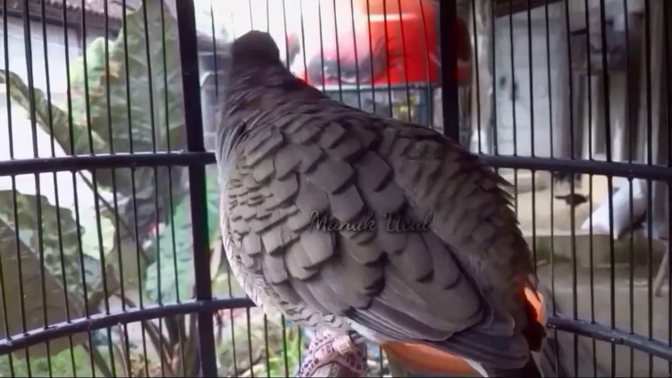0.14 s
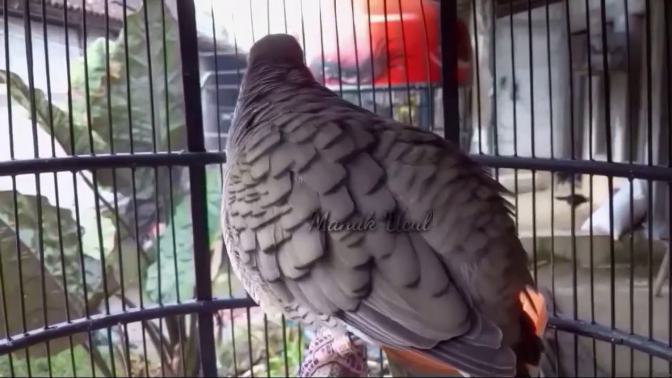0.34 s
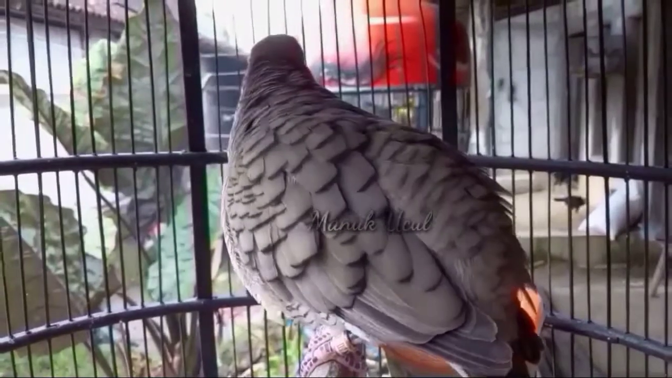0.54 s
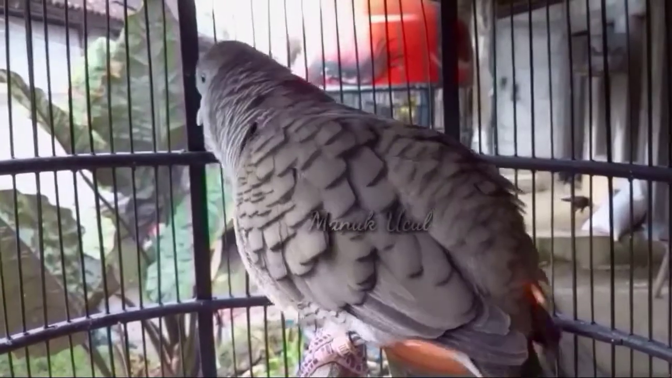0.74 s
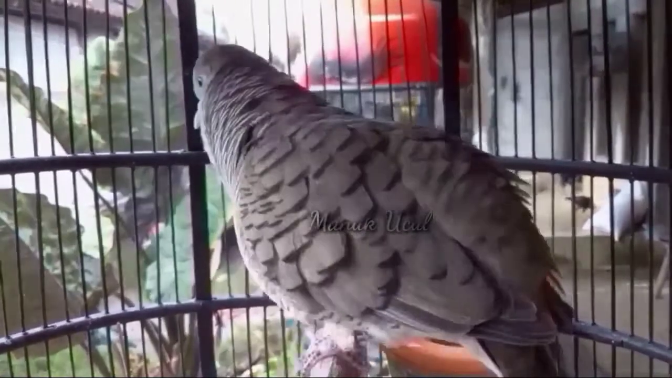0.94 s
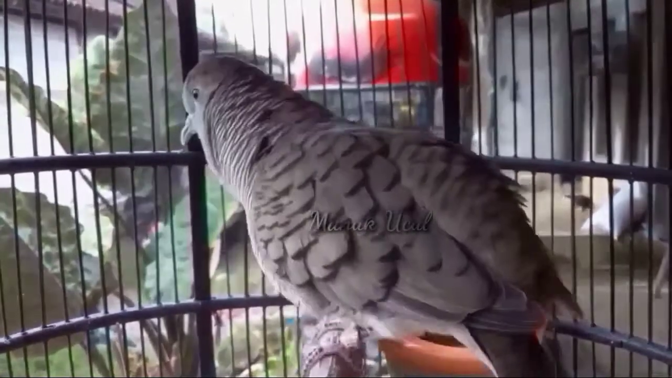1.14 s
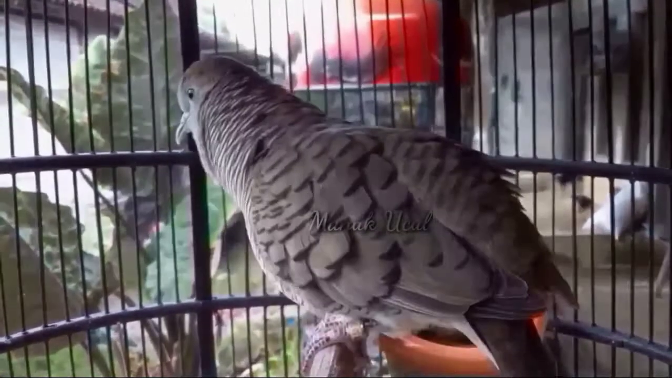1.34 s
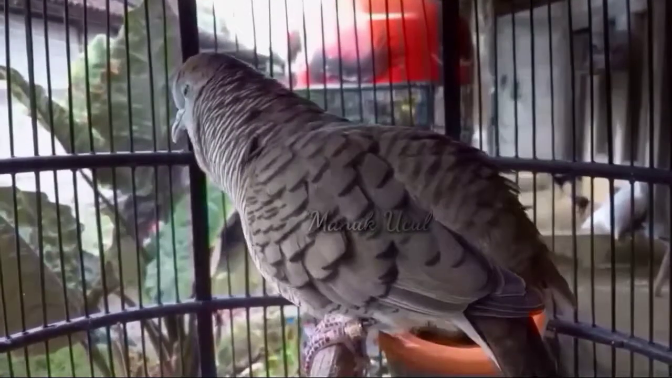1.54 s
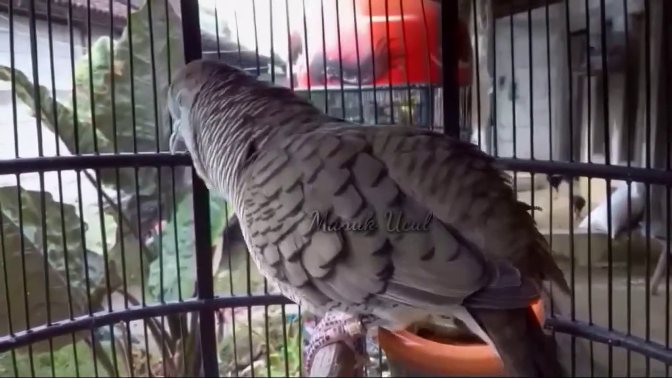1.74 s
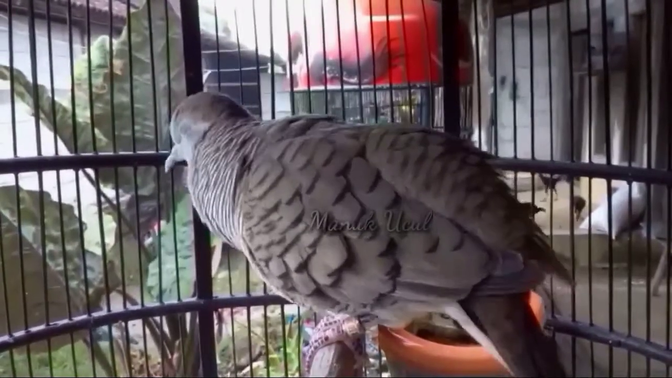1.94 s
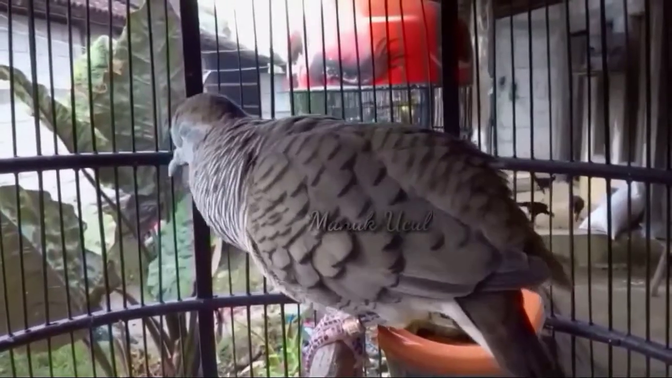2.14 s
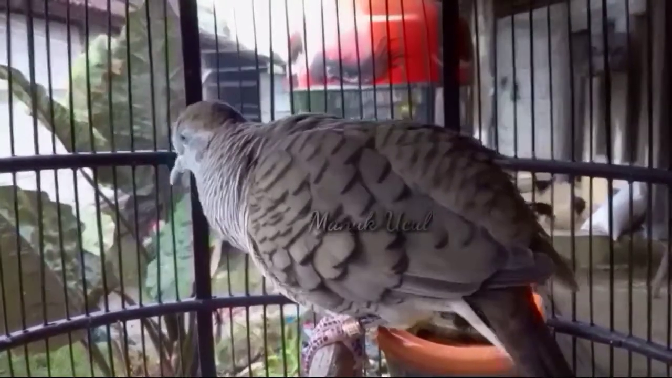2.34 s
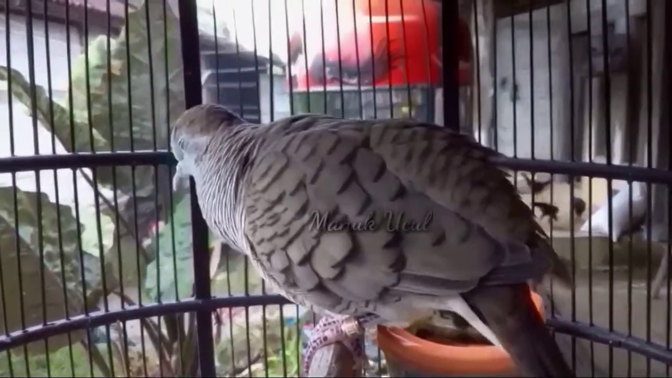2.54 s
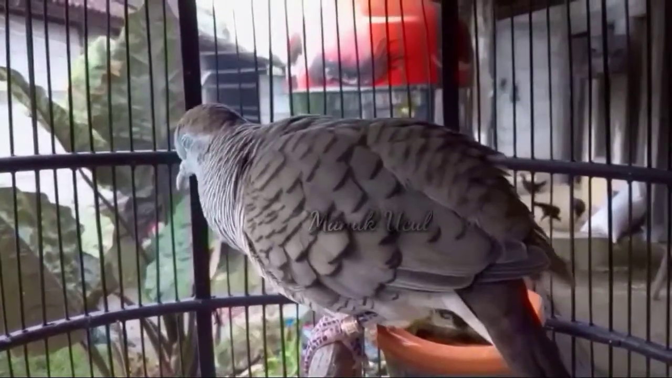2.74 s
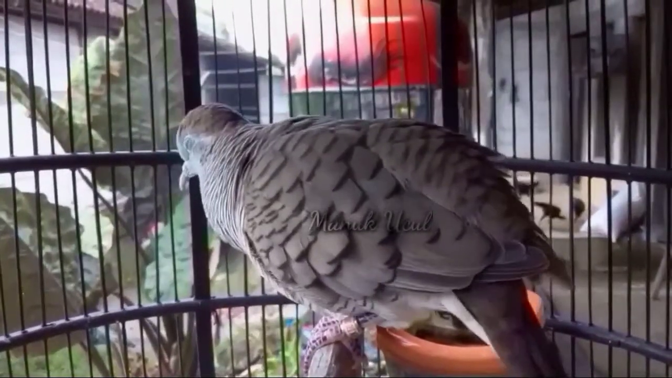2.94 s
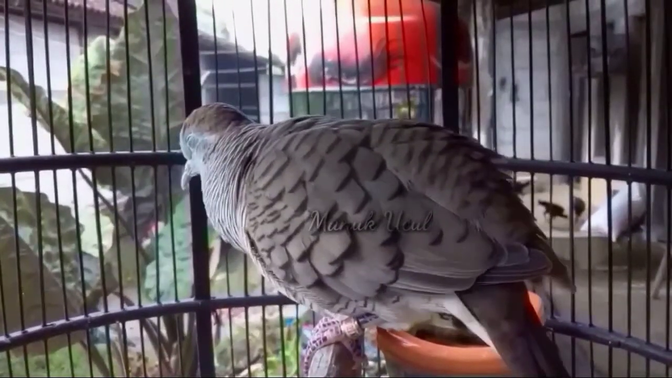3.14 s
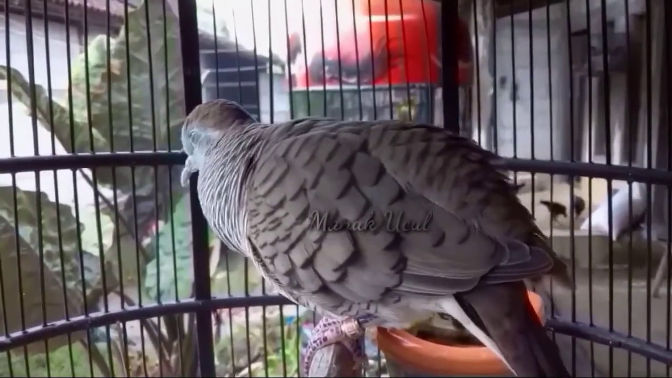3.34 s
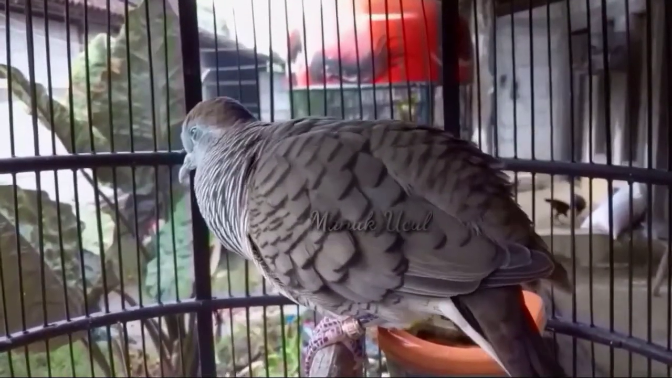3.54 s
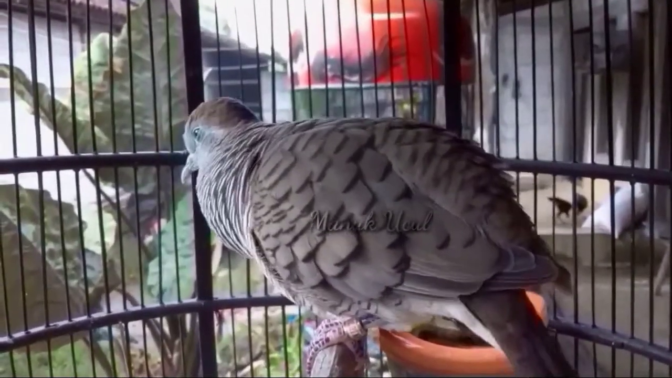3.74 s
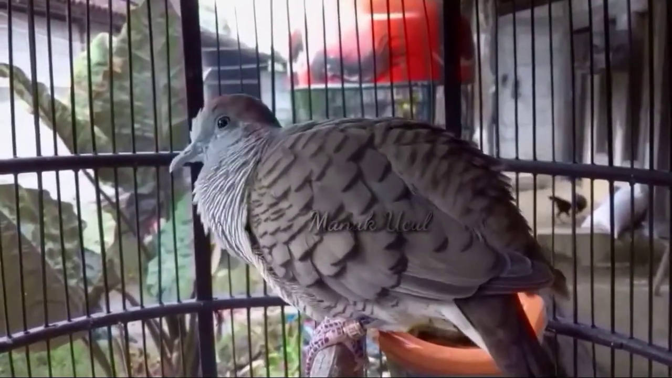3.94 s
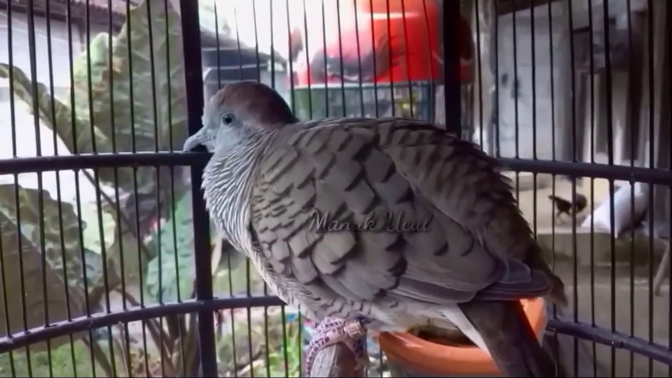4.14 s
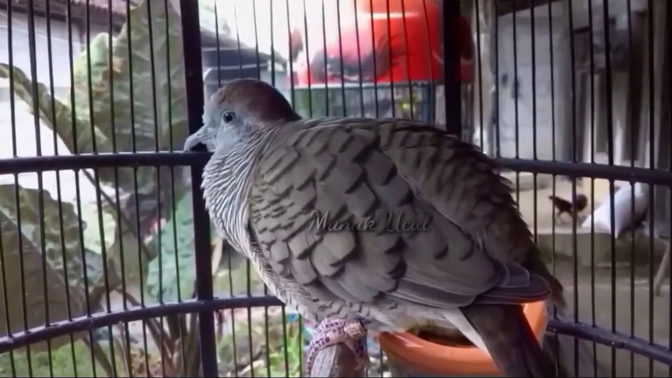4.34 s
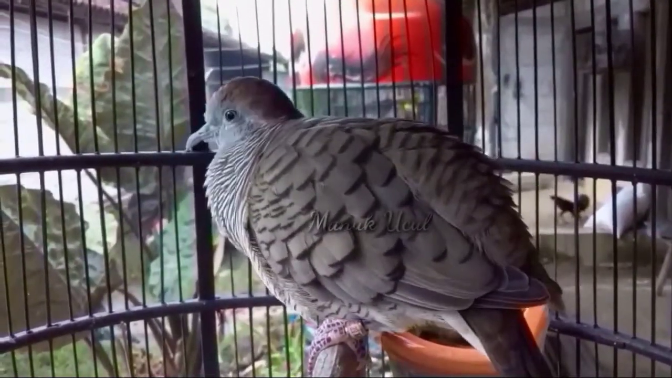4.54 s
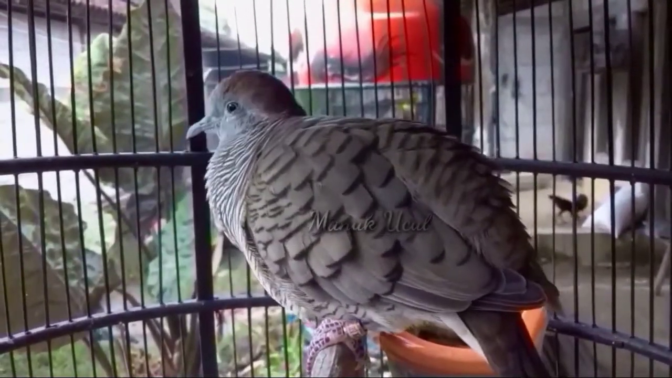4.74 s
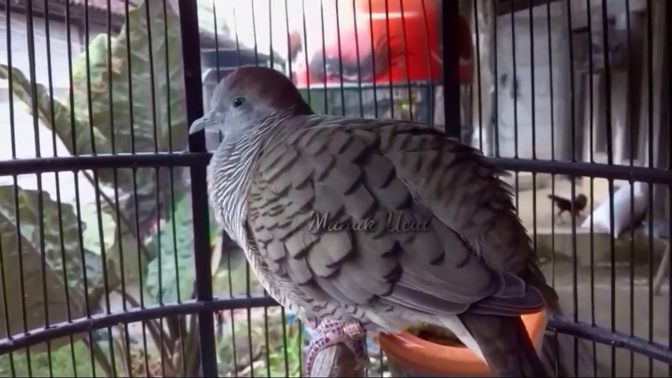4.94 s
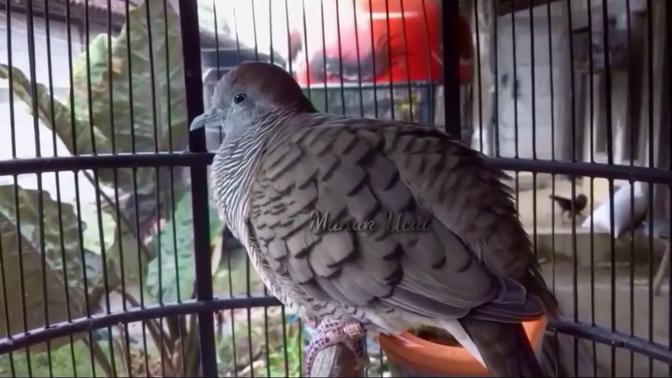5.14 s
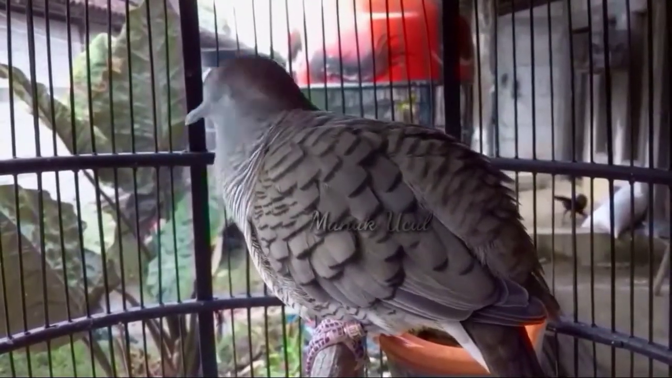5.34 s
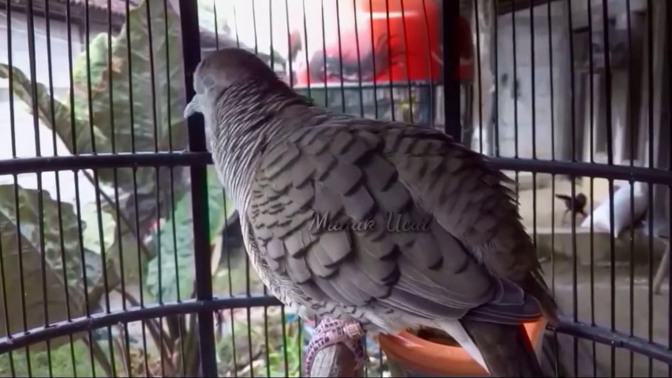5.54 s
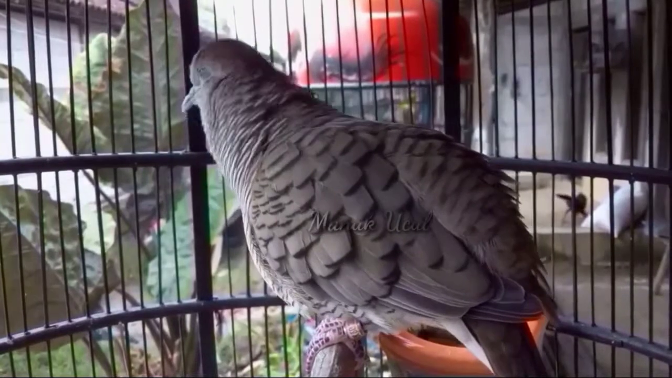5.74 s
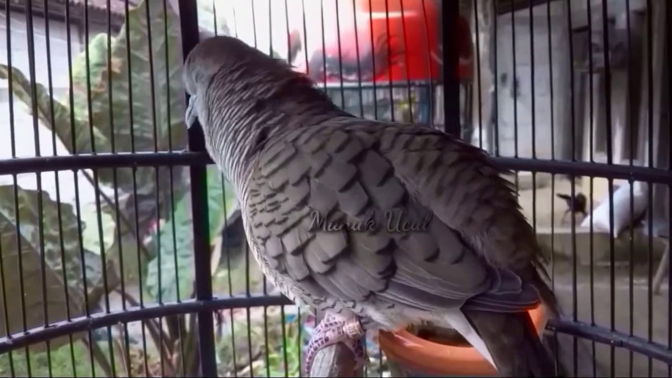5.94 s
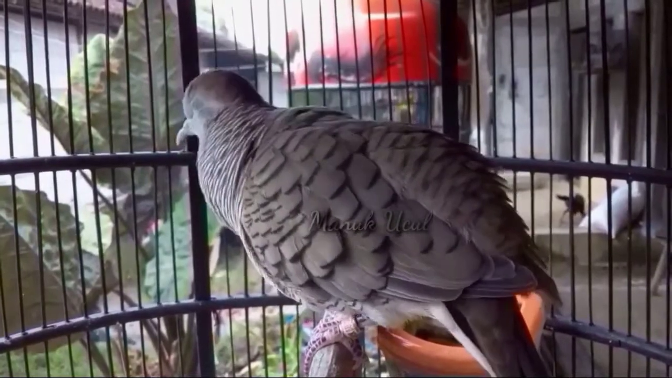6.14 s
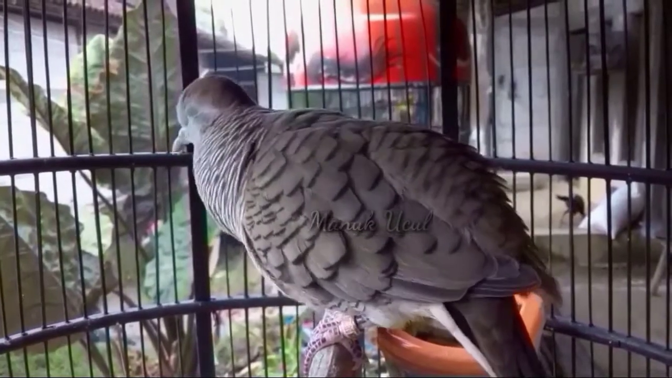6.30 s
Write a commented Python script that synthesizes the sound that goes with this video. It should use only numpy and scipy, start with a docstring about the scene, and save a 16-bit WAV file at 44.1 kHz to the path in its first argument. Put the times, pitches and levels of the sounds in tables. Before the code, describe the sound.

A yard with a faint low town rumble and thin insect hiss throughout. For the first two seconds, small birds give quiet falling chirps, with distant coos and a couple of tiny squawks; feathers rustle softly from about 1 second. At 2.1 seconds a caged dove, close to the microphone, sings a loud note that leaps upward and slightly overloads. Four short coos follow between 2.6 and 3.3 seconds, then a longer falling coo from 3.5 to 3.9. Each note is nearly pure, with a brief rasp at its start. The background dips around the song, while faint, evenly repeated hoots run from 2 to 4.5 seconds. A distant dove answers softly from 4.5 seconds with a leap, five short coos and a long one. At about 6.3 seconds the close dove begins another loud leaping note.

```python
"""A yard with a caged zebra dove close to the microphone: a leaping note, four short coos, a long
falling one, then the next leap. Each note opens with a rasp of the syrinx and settles into a near-pure
tone, filtered by the swollen throat; the loudest overloads the microphone. A far dove answers, other
birds chirp, coo, squawk and hoot, and feathers rustle. Insects hiss over a low town rumble; the
recorder turns both down around the loud song."""
import sys
import numpy as np
from scipy import signal
from scipy.fft import rfft, irfft
from scipy.io import wavfile
from scipy.ndimage import uniform_filter1d

SR = 44100
rng = np.random.default_rng(int(sys.argv[2]) if len(sys.argv) > 2 else 0)


def put_to_file(sound):
    """Save the sound as 16-bit audio at rate SR, in the file named by the first command-line argument."""
    columns = np.atleast_2d(sound).T  # one column per channel
    safe = np.clip(columns, -1, 1)
    whole_steps = np.round(safe * 32767)
    wavfile.write(sys.argv[1], SR, whole_steps.astype(np.int16))


N = 285327
TIME_S = np.arange(N) / SR

# Town rumble spectrum. Each row: frequency in Hz, relative density in dB.
RUMBLE_SPECTRUM = [(25, -17.5), (45, -5), (62, 3.5), (100, 3), (145, 2.5), (185, -6.5), (320, -8.5),
                   (480, -17), (620, -20), (820, -18), (1000, -21.5), (1400, -26.5), (2200, -36.5),
                   (3000, -39.5)]
# Broad hiss spectrum. Each row: frequency in Hz, relative density in dB.
HISS_SPECTRUM = [(2500, -12.5), (4750, -7.5), (6500, -16), (7500, -9), (8800, -15), (10300, 0.5),
                 (11200, -3.5), (12500, -11.5), (15500, -21.5)]
# Preset gain curve: the recorder turns rumble and hiss down around the loud song, then lets them back
# up. Each row: time in seconds, relative rumble level in dB, relative hiss level in dB.
RECORDER_DUCKING = [(0.0, -60.5, -75.5), (0.23, -48.5, -68.5), (0.41, -46, -67.5), (1.27, -44.5, -64.5),
                    (2.15, -45.5, -66), (2.46, -55.5, -72), (3.83, -49.5, -70.5), (4.13, -56, -75.5),
                    (4.96, -55.5, -74.5), (5.34, -46.5, -65), (5.64, -44.5, -65.5), (6.45, -45.5, -65)]
# Small birds' chirps. Each row: start in seconds, starting pitch in Hz, relative level in dB.
BIRD_CHIRPS = [(0.138, 3950, -47), (0.467, 3540, -49), (.64, 4610, -57), (0.95, 4270, -45.5),
               (1.143, 4320, -46), (1.666, 3900, -49), (2.571, 4010, -49.5), (2.852, 3590, -53.5),
               (3.066, 4320, -50.5), (3.552, 4410, -54.5), (4.05, 4330, -60.5), (4.549, 4090, -63),
               (5.03, 4600, -63), (5.622, 4670, -54.5)]
# Far doves' lone coos. Each row: start in seconds, length in seconds, pitch in Hz,
# fall as a share of pitch, relative level in dB.
LONE_COOS = [(0.226, 0.37, 699.6, 0.14, -52), (.68, 0.18, 789, 0.0059, -53), (1.27, 0.5, 799, 0.046, -53.5),
             (3.102, 0.44, 333.6, 0, -50.5), (5.904, 0.19, 573, 0, -48)]
# Far squawks. Each row: start in seconds, length in seconds, pitch in Hz, relative level in dB.
FAR_SQUAWKS = [(.85, 0.047, 1084, -51), (1.067, 0.037, 1020, -45), (4.053, 0.021, 1040, -54),
               (4.731, 0.032, 1016, -53.5)]
# Squawk timbre. Each entry: gain of one harmonic in dB, fundamental first.
SQUAWK_HARMONICS_DB = [8, -3, -17, -37, -48, -38, -18]
# Moves of feathers and feet. Each row: start in seconds, length in seconds, level in dB.
PERCH_MOVES = [(1.066, 0.078, -55), (1.208, 0.17, -46.5), (1.504, 0.024, -51.5), (1.943, 0.046, -53),
               (1.97, 0.23, -54.5), (2.05, 0.0073, -44), (5.442, 0.086, -59), (6.24, 0.016, -47.5)]
# Feather friction spectrum. Each row: frequency in Hz, relative density in dB.
FEATHER_SPECTRUM = [(500, -16.5), (1100, -1), (1800, -5.5), (2600, -10.5), (4000, -14), (7000, -8.5),
                    (10000, -18), (15500, -27.5)]
# One bird's repeated hoot. Each entry: start in seconds.
HOOT_STARTS_S = [1.999, 2.269, 2.511, 2.732, 2.979, 3.25, 3.52, 3.79, 4.059, 4.341]
# Leaps that open a phrase. Each row: start in seconds, climb in seconds, top pitch in Hz,
# sag as a share of pitch, tone gain in dB, rasp peak in dB.
LEAP_NOTES = [(2.108, .0645, 1046, .1, 2.3, -9), (6.299, .062, 1018, .06, .8, -8.5)]
# Overtones leaking through the throat. Each row: frequency in Hz, gain in dB re the fundamental.
THROAT_LEAK = [(1600, -42.5), (2000, -43), (2400, -46.5), (3200, -64.5), (4100, -66.5), (4900, -69.5),
               (5600, -53.5), (6400, -66), (7300, -68.5), (8200, -77.5), (10000, -83), (14000, -91)]
# First reflections from cage and porch. Each row: delay in seconds, gain in dB.
PORCH_ECHOES = [(.009, -37), (.021, -32), (.043, -26.5), (.078, -35)]
# The caged dove's short coos. Each row: start in seconds, length in seconds, pitch in Hz,
# tone gain in dB, rasp peak in dB.
SHORT_COOS = [(2.635, 0.054, 849.6, -4, -17.5), (2.832, 0.06, 843.3, -4.5, -21),
              (3.032, .07, 833, -5.5, -21), (3.241, 0.081, 823.3, -4, -26)]


def undb(db):
    return 10 ** (np.asarray(db) / 20)


def unit_rms(x):
    return x / np.sqrt(np.mean(x ** 2) + 1e-18)


def add(out, start_s, x):
    i = max(int(start_s * SR), 0)
    out[i:i + len(x)] += x[:max(N - i, 0)]


def gain_at(hz, spectrum):
    """Linear gain from (Hz, dB) rows, on a log-frequency axis."""
    knots_hz, db = np.transpose(spectrum)
    return undb(np.interp(np.log(np.maximum(hz, 1)), np.log(knots_hz), db))


def noise(spectrum):
    """Shaped noise of rms 1, rolled off beyond the spectrum's ends."""
    hz = np.arange(N // 2 + 1) * SR / N
    rolloff = np.minimum(hz / spectrum[0][0], 1) ** 2 / np.maximum(hz / spectrum[-1][0], 1) ** 2
    return unit_rms(irfft(rfft(rng.standard_normal(N)) * gain_at(hz, spectrum) * rolloff, N))


def walk(n, rate_hz):
    """Smooth random wander, spread near 1."""
    hold = max(int(SR / rate_hz), 1)
    return uniform_filter1d(np.repeat(rng.standard_normal(n // hold + 1), hold), hold)[:n]


def resonate(x, hz, width_hz):
    """Two-pole resonance, unity gain at centre."""
    return signal.lfilter(*signal.iirpeak(hz, hz / width_hz, fs=SR), x)


def progress(length_s):
    return np.linspace(0, 1, max(int(length_s * SR), 8))


def seconds(length_s):
    return progress(length_s) * length_s


def arch(u):
    return np.abs(np.sin(np.pi * u))


def smooth_step(t, at_s, width_s):
    return .5 + .5 * np.tanh((t - at_s) / width_s)


def phase_of(hz):
    return 2 * np.pi * np.cumsum(hz) / SR


def yard(x, t60_s):
    """Diffuse reflections from walls and plants, unity power gain."""
    t = TIME_S[:SR]
    build_up = np.minimum(t / .02, 1)
    tail = rng.standard_normal(SR) * np.exp(-np.log(1000) * t / t60_s) * build_up
    return signal.fftconvolve(x, tail / np.sqrt(np.sum(tail ** 2)))[:N]


def in_yard(x, direct_db, reverb_db, t60_s):
    return undb(direct_db) * x + undb(reverb_db) * yard(x, t60_s)


def town_rumble():
    """Low town noise, turned down by the recorder around the loud song."""
    times_s, rumble_db, _ = np.transpose(RECORDER_DUCKING)
    ducked_db = np.interp(TIME_S, times_s, rumble_db) + 2.5
    return noise(RUMBLE_SPECTRUM) * undb(ducked_db + walk(N, 28))


def insects_and_chatter(shrill_hz=4750, width_hz=490):
    """Insects shrill in uneven waves over broad hiss and far birds; the recorder ducks them all."""
    times_s, _, hiss_db = np.transpose(RECORDER_DUCKING)
    band = resonate(resonate(rng.standard_normal(N), shrill_hz, width_hz), shrill_hz, width_hz)
    shrill = unit_rms(band) * undb(-5 + 1.6 * walk(N, 21))
    treble = shrill + undb(-4.5) * noise(HISS_SPECTRUM) + undb(-6.5) * chatter()
    return treble * undb(np.interp(TIME_S, times_s, hiss_db) + 8)


def chatter(count=220):
    """Tiny, very distant bird notes, heard only by reflection."""
    calls = np.zeros(N)
    u = progress(length_s=.11)
    for when, height, slope, faintness in rng.random((count, 4)):
        hz = 2300 * 2.6 ** height * (1 + .35 * (slope - .5) * u + .03 * walk(len(u), 500))
        add(calls, when * N / SR, undb(-6 * faintness) * arch(u) * np.sin(phase_of(hz)))
    return unit_rms(yard(calls, t60_s=.5))


def chirps(fall_hz_per_s=11000, end_hz=2810):
    """Small birds: buzzy notes falling at one rate to one pitch, blurred by distance."""
    calls = np.zeros(N)
    for start_s, start_hz, db in BIRD_CHIRPS:
        u = progress((start_hz - end_hz) / fall_hz_per_s)
        buzz = .045 * walk(len(u), 700) + .02 * walk(len(u), 60)
        hz = (start_hz + (end_hz - start_hz) * u ** .99) * (1 + buzz)
        envelope = undb(db + 2.5 * walk(len(u), 43)) * arch(u ** 1.5) ** .46
        add(calls, start_s, envelope * np.sin(phase_of(hz)))
    return in_yard(calls, direct_db=-7, reverb_db=-6, t60_s=.39)


def lone_coos():
    """Other doves: wavering pure tones, level or falling in pitch."""
    calls = np.zeros(N)
    for start_s, length_s, centre_hz, fall, db in LONE_COOS:
        u = progress(length_s)
        hz = centre_hz * (1 + fall * (.5 - u) + .02 * walk(len(u), 160))
        add(calls, start_s, undb(db) * arch(u ** .5) ** .5 * np.sin(phase_of(hz)))
    return calls


def squawks():
    """Brief nasal calls: harmonics on a jittering pitch."""
    calls = np.zeros(N)
    for start_s, length_s, hz, db in FAR_SQUAWKS:
        u = progress(length_s)
        phase = phase_of(hz * (1 + .025 * walk(len(u), 300)))
        tone = sum(gain * np.sin(k * phase) for k, gain in enumerate(undb(SQUAWK_HARMONICS_DB), 1))
        add(calls, start_s, undb(db) * arch(u) ** .5 * tone)
    return calls


def feathers(tick_count=14, tick_s=.008):
    """The dove shifts on its perch: grainy feather brushes and faint claw ticks."""
    envelope = np.zeros(N)
    for start_s, length_s, db in PERCH_MOVES:
        add(envelope, start_s, undb(db) * arch(progress(length_s) ** .37))
    times_s, rumble_db, _ = np.transpose(RECORDER_DUCKING)
    for when, size in rng.random((tick_count, 2)):
        start_s = when * N / SR
        tick_db = np.interp(start_s, times_s, rumble_db) - 20 + 4.5 * size
        add(envelope, start_s, undb(tick_db) * arch(progress(tick_s) ** .48))
    brush = envelope * noise(FEATHER_SPECTRUM) * undb(4.8 * walk(N, 420))
    return in_yard(brush, direct_db=0, reverb_db=-8.5, t60_s=.25)


def hoots(first_hz=1312, sink_hz=3.5, scoop_share=.11):
    """A soft hoot slides up to pitch as it swells; each repeat is slightly lower."""
    calls = np.zeros(N)
    u = progress(length_s=.15)
    for k, start_s in enumerate(HOOT_STARTS_S):
        bend = 1 - scoop_share * (1 - u) ** 3 + .012 * walk(len(u), 200)
        hz = (first_hz - k * sink_hz) * bend
        add(calls, start_s, arch(u ** .95) * np.sin(phase_of(hz)))
    return in_yard(calls, direct_db=-42.5, reverb_db=-45.5, t60_s=.45)


def caged_dove(rasp_lead_s=.012):
    """The close song, a rasp ahead of each note, with porch echoes and a faint yard tail."""
    notes = [(start_s, leap(climb_s, top_hz, sag), db, rasp_db)
             for start_s, climb_s, top_hz, sag, db, rasp_db in LEAP_NOTES]
    notes += [(start_s, short_coo(length_s, hz), db, rasp_db)
              for start_s, length_s, hz, db, rasp_db in SHORT_COOS]
    notes += [(3.472, long_coo(), -3, -19)]
    song = np.zeros(N)
    for start_s, contour, db, rasp_db in notes:
        add(song, start_s, undb(db) * dove_voice(*contour))
        add(song, start_s - rasp_lead_s, undb(rasp_db) * rasp())
    out = song + undb(-24.5) * yard(song, t60_s=.5) + undb(-43.5) * yard(song, t60_s=.84)
    for delay_s, db in PORCH_ECHOES:
        add(out, delay_s, undb(db) * song)
    return out


def rasp(length_s=.02, flap_hz=349):
    """Before the tone locks in, the syrinx flaps slowly and unevenly, ringing the throat."""
    u = progress(length_s)
    cycles = np.floor(np.cumsum(flap_hz * (1 + .21 * walk(len(u), 330))) / SR)
    flaps = np.diff(cycles, prepend=-1) * (.75 + arch(u ** 1.7))
    flaps = np.pad(flaps, (0, SR // 100))
    upper_ring = resonate(resonate(flaps, 1030, 170), 810, 290)
    lower_ring = resonate(resonate(flaps, 500, 230), 800, 360)
    lowpass = signal.butter(6, 1200, fs=SR, output="sos")
    ring = signal.sosfilt(lowpass, upper_ring + undb(-15) * lower_ring)
    return ring / np.max(np.abs(ring))


def dove_voice(t, contour_hz, contour_db, flash_s=.028, strain_db_per_octave=26):
    """Sound of one note contour: the throat passes the fundamental and little else."""
    hz = contour_hz * (1 + .003 * walk(len(t), 400))
    db = contour_db + .3 * walk(len(t), 120)
    phase = phase_of(hz)
    # The syrinx closes sharply at onset and on high notes, lifting the upper overtones.
    flash_db = 25 * np.exp(-t / flash_s)
    bright_db = flash_db + strain_db_per_octave * np.log2(contour_hz / 800)
    tone = np.sin(phase)
    for k in range(2, 14):
        lift_db = (k > 3) * bright_db + 4.2 * walk(len(t), 90)
        tone += gain_at(k * hz, THROAT_LEAK) * undb(lift_db) * np.sin(k * phase)
    low_hiss = unit_rms(resonate(rng.standard_normal(len(t)), 1800, 1100))
    high_hiss = unit_rms(resonate(rng.standard_normal(len(t)), 4700, 3000))
    # A brief burst of hiss, like microphone overload, where the pitch leaps.
    burst = np.clip(np.gradient(contour_hz) * SR / 20000, 0, 1) ** 2
    hiss = (undb(flash_db - 63) + undb(-38) * burst) * (low_hiss + undb(-3) * high_hiss)
    edges = np.clip(np.minimum(t, t[-1] - t) / .0022, 0, 1)
    return (tone + hiss) * edges * undb(db)


def open_close(t, hz, db, droop_share, droop_s, scoop_share=.14, open_s=.014, close_s=.0042):
    """Note contour (s, Hz, dB): pitch and level scoop up at the opening and droop at the close."""
    left_s = t[-1] - t
    opening = np.exp(-t / open_s)
    closing = np.exp(-left_s / close_s)
    bend = 1 - scoop_share * opening - droop_share * np.exp(-left_s / droop_s)
    return t, hz * bend, db - 16 * opening - 22.5 * closing


def leap(climb_s, top_hz, sag, base_hz=810, step_hz=68, hold_s=.231):
    """Contour: a low note steps up, falters, breaks into the high register, then sags and fades."""
    t = seconds(climb_s + hold_s)
    held = np.maximum(t - climb_s, 0) / hold_s
    low_hz = base_hz + step_hz * smooth_step(t, .76 * climb_s, width_s=.004)
    high_hz = top_hz * (1 - sag * held ** 1.5)
    falter_db = -7 * np.exp(-np.abs(t - climb_s) / .003)
    ease_db = -2.1 * smooth_step(t, climb_s + .039, width_s=.008)  # the first push gives way
    flutter_db = 1.2 * held * walk(len(t), 70)
    high = smooth_step(t, climb_s, width_s=.0015)
    hz = (1 - high) * low_hz + high * high_hz
    db = (1 - high) * (falter_db - 1.5) + high * (ease_db + flutter_db - 4.3 * held)
    return open_close(t, hz, db, droop_share=.26, droop_s=.005)


def short_coo(length_s, hz):
    """Contour: so brief that opening and close form one arch."""
    return open_close(seconds(length_s), hz, db=0, droop_share=.13, droop_s=.01)


def long_coo(start_hz=814.4, sag_hz=70.7, sag_s=.29, peak_s=.11, swell_db_per_s=18.5, fade_db_per_s=27):
    """Contour: the phrase's last note swells, then fades as its pitch settles lower."""
    t = seconds(length_s=.4563)
    hz = start_hz - sag_hz * (1 - np.exp(-t / sag_s))
    db = np.minimum(swell_db_per_s * (t - peak_s), fade_db_per_s * (peak_s - t))
    return open_close(t, hz, db, droop_share=.015, droop_s=.0039)


def answering_dove(leap_at_s=4.46, run_at_s=5.005, long_at_s=6.09):
    """A far dove, mostly reflections: a leap, five short coos and the long one."""
    song = np.zeros(N)
    add(song, leap_at_s, undb(-45.5) * dove_voice(*leap(climb_s=.092, top_hz=1064, sag=.069)))
    # The run slows, lengthens and sinks in pitch, growing louder as the recorder's gain recovers.
    for k in range(5):
        start_s = run_at_s + k * (.19 + .0093 * k)
        recovery_db = -7 * np.exp(-k)
        contour = short_coo(length_s=.0568 + .014 * k, hz=863 - 8 * k)
        add(song, start_s, undb(recovery_db - 39) * dove_voice(*contour))
    add(song, long_at_s, undb(-37) * dove_voice(*long_coo()))
    return in_yard(song, direct_db=-5.5, reverb_db=-1, t60_s=.6)


def scene():
    doves = caged_dove() + answering_dove()
    neighbours = in_yard(lone_coos() + squawks(), direct_db=-3, reverb_db=-3, t60_s=.55)
    mix = doves + neighbours + hoots() + chirps() + feathers() + town_rumble() + insects_and_chatter()
    return mix[None]


def record(dry, cutoff_hz=15600):
    """Microphone overload flattens peaks at full scale; a steep low-pass cuts the top."""
    clipped = dry / (1 + np.abs(dry) ** 36) ** (1 / 36)
    return signal.sosfilt(signal.ellip(8, .1, 80, cutoff_hz, fs=SR, output="sos"), clipped)


dry = scene()
out = record(dry)
put_to_file(out)
```